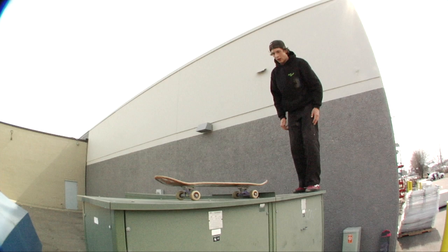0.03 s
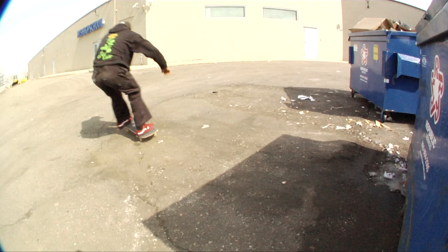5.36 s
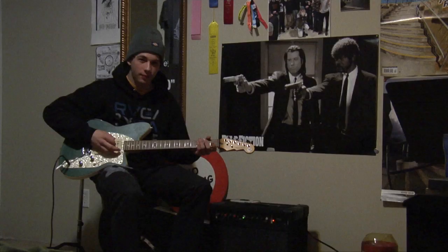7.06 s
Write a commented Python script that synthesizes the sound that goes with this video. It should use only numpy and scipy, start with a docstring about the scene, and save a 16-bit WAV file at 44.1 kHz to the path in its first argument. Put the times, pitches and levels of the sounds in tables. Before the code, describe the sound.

A skateboarder shuffles on a hollow metal cabinet, lands on it with two ringing booms, then smacks down on asphalt and rolls away over grit.

```python
"""First heard: far traffic humming and a skater shuffling on a hollow steel cabinet. Two jumps on the board boom
the sheet steel; a smack on asphalt overloads the microphone, yard walls answer, hard wheels roll away over grit.
Steel is noise dying band by band plus a few sine modes; scuffs, deck, walls and traffic are shaped noise;
rolling is rumble, grit and hiss plus single stone knocks. The rasp is three gliding fuzzy tones.
"""
import sys
import numpy as np
from scipy import signal
from scipy.fft import rfft, irfft, next_fast_len
from scipy.io import wavfile
from scipy.ndimage import uniform_filter1d, map_coordinates

SR = 44100
rng = np.random.default_rng(int(sys.argv[2]) if len(sys.argv) > 2 else 0)


def convert_level_to_amplitude(level_db):
    """Map a level in decibels to its linear amplitude factor."""
    exponent = np.asarray(level_db, float) / 20
    return 10 ** exponent


def inscribe(sig):
    """Save sig as 16-bit PCM at rate SR to the path in sys.argv[1].

    A 1-D sig is mono; a 2-D sig holds one channel per row.
    Samples are clipped to [-1, 1] before scaling.
    """
    pcm = np.round(np.clip(np.atleast_2d(sig).T, -1, 1) * 32767)
    wavfile.write(sys.argv[1], SR, pcm.astype(np.int16))


N = 317981

# Heavy blows on the cabinet. Each row: start in seconds, level in dB, ring length factor,
# brightness in dB per octave, rise in seconds.
BOOMS = [(2.7432, 6, 0.56, -0.5, 0.00069), (2.775, -7.5, 1, 2.5, .002), (3.0, -14, 0.84, 0.5, 0.019),
         (3.333, -4.5, 1, -0.5, 0.0011), (3.358, -5, 0.78, 4, 0.004), (3.41, -9.5, 0.62, 4.5, 0.011),
         (3.53, -21.5, 1, 2, .01), (3.635, -25.5, 0.99, -4, 0.02)]
# Dense modes of the sheet steel. Each row: frequency in Hz, relative density at the blow in dB per Hz.
STEEL_SPECTRUM = [(25, -30), (110, 3.5), (190, 6.5), (300, 9), (394, -3.5), (490, 8.5), (620, 2),
                  (750, -2.5), (1370, -6.5), (3500, -16.5), (5900, -26), (15000, -45)]
# Steel decay at length factor 1. Each row: frequency in Hz, t60 in seconds.
STEEL_T60 = [(40, 1.39), (200, 1.58), (500, 1.51), (1400, 1.02), (3000, 0.67), (8000, 0.24), (15000, 0.049)]
# Strongest single lid modes, nominal. Each row: frequency in Hz, relative level in dB, t60 in seconds at factor 1.
LID_MODES = [(174.3, 3.5, 0.66), (208, -5, 0.38), (317.5, -2, 1.6), (490, -6.5, 1.7), (608, -8.5, 0.26)]
# Loose panel, one row: centre in Hz, width in Hz, time in seconds when it starts to settle.
BUZZ = (8151, 400, 3.77)
# Blows that set the panel off. Each row: time in seconds, level in dB, t60 in seconds.
BUZZ_STARTS = [(2.76, -20.5, 1.02), (3.335, -20, 0.75)]
# Weaker panel modes. Each row: frequency in Hz, relative level in dB.
BUZZ_SIDES = [(6850, -11), (10300, -16)]
# Loose fittings on the steel. Each row: frequency in Hz, relative density in dB per Hz.
CLATTER_SPECTRUM = [(800, -18), (2000, 5.5), (3300, 2), (4600, -3.5), (6000, -8.5), (10500, -20.5),
                    (13000, -29)]
# Fittings shaken once more, one row: time in seconds, level in dB, rise, hold and t60 in seconds.
RATTLE = (3.645, -25, .025, .04, .35)
# Light contacts of shoe, tail and wheels on the cabinet. Each row: start in seconds, relative level in dB,
# ring length factor (floored in use), brightness in dB per octave.
TAPS = [(0.4001, -26.5, 0.065, -4.5), (2.0086, -18, 0.15, 0), (2.035, -26, 0.14, -1.5),
        (2.051, -39, 0.055, 5), (2.1565, -25, 0.73, 1.5), (2.365, -33, 0.11, 7.5), (2.399, -37, 0.11, 5),
        (2.4182, -14, 0.11, 3.5), (3.951, -35, 0.015, 6.5), (3.991, -38, 0.029, 8), (4.0602, -17, 0.6, 3.5),
        (4.361, -28, 0.11, -11), (4.4058, -13, 0.11, 3.5), (4.415, -19, 0.081, 4), (4.449, -25.5, 0.3, 2),
        (4.137, -33, 0.0706, 3)]
# Hard contact. Each row: frequency in Hz, relative density in dB per Hz.
CRACK_SPECTRUM = [(600, 7), (1500, 15), (3200, 15), (5300, -10.5), (7500, -21), (10000, -30), (13000, -39),
                  (16000, -57)]

# Landing, wheels then feet. Each row: start in seconds, level in dB before overload, hold and t60 in seconds.
LANDING = [(4.7085, 10.5, 0.0048, 0.073), (4.733, -11, 0.01, 0.028)]
# Wooden deck on asphalt. Each row: frequency in Hz, relative density in dB per Hz, before the tilts.
DECK_SPECTRUM = [(15, -75), (25, -26.5), (153, -1.5), (340, -5.5), (506, -3.5), (660, -5), (950, -11),
                 (1320, -15), (1660, -17.5), (2600, -27.5), (3600, -28.5), (4610, -43), (7710, -41),
                 (16000, -69)]
WALLS_S, WALLS_DB, WALLS_RISE_S, WALLS_HOLD_S, WALLS_T60_S = 4.8, -17.5, 0.062, 0.049, 0.39
WALLS_END_S = 4.95  # the last wall has answered

# Surface under the wheels. Each row: time in seconds, roughness in dB.
ROLL = [(5.0, -53), (5.035, -51), (5.045, -43), (5.09, -45), (5.15, -49), (5.33, -39.5), (5.44, -43),
        (5.465, -38), (5.49, -42), (5.52, -36), (5.58, -34.5), (5.64, -41.5), (5.72, -41.5), (6.0, -42),
        (6.13, -49.5), (6.28, -39.5), (6.32, -51), (6.49, -51), (6.54, -37.5), (6.6, -53.5), (6.93, -55.5),
        (7.02, -46), (7.121, -49)]
# Weight pressing the deck. Each row: time in seconds, rumble level in dB at mean roughness.
WEIGHT = [(5.0, -38), (5.3, -36.5), (5.6, -44), (6.2, -40.5), (6.6, -41), (6.9, -38), (7.12, -40.5)]
# Rumble through the deck. Each row: frequency in Hz, relative density in dB per Hz.
RUMBLE_SPECTRUM = [(15, -59), (25, -27.5), (97, 1.5), (269, -2), (300, 3.5), (378, -5), (469, 0.5),
                   (1000, -14.5), (1300, -48), (2200, -120)]
# Small grit. Each row: frequency in Hz, relative density in dB per Hz.
GRIT_SPECTRUM = [(470, -33), (800, 5), (1070, 3), (1310, 5), (2000, -1), (2550, -6), (3150, -7.5),
                 (3620, -10), (4000, -20.5), (5200, -43), (8800, -120)]
# Bearings and fine dust. Each row: frequency in Hz, relative density in dB per Hz.
HISS_SPECTRUM = [(1760, -38), (3000, -4), (4570, -6.5), (6860, -6), (8000, -8.5), (8820, -17), (12600, -17),
                 (13700, -24), (16000, -27.5)]
# Larger stones. Each row: start in seconds, relative level in dB, knock pitch in Hz, relative treble in dB.
STONES = [(5.044, -30, 1400, -3), (5.0742, -28.5, 1240, -7.5), (5.0928, -31, 1190, -0.5),
          (5.242, -23.5, 1110, -4.5), (5.264, -23.5, 1200, -36), (5.285, -24, 950, -23),
          (5.309, -34, 805, -5), (5.326, -21.5, 997, -13), (5.368, -21, 1260, -13),
          (5.503, -23, 1414, -26.5), (5.515, -29, 1310, 4.5), (5.5301, -19, 2090, -24),
          (5.5553, -23, 1600, -4), (5.6027, -22, 1926, -13), (5.623, -21, 1880, -10),
          (5.651, -20, 1990, -27), (5.6656, -25, 1580, -22), (5.6904, -17.5, 1420, -15),
          (5.7152, -25, 1415, -13), (5.762, -23, 1994, -25.5), (5.814, -25, 1353, -7),
          (5.8629, -19, 2083, -13), (5.914, -24.5, 1904, -24.5), (5.9619, -23.5, 1430, -2.5),
          (5.994, -27, 1870, -21), (6.0254, -29, 1400, -16), (6.087, -33, 1420, 0.5),
          (6.203, -28, 1250, -20), (6.493, -41, 1290, 10.5), (6.509, -29, 1830, 2.5),
          (6.5302, -31, 1318, -2), (6.5787, -24, 1280, -7), (6.6513, -33, 1350, -4),
          (6.7366, -24.5, 1440, -24.5), (6.856, -34.5, 1470, -2), (6.976, -38, 1430, -20),
          (7.0188, -28, 1530, -18.5)]
RUMBLE_FOLLOWS, HISS_FOLLOWS = 0.61, 0.59  # dB per dB of roughness
HISS_DB = -57  # at mean roughness
GRAIN = .75  # share of the bumps in grit and hiss
SCRATCH_T60_S, KNOCK_T60_CYCLES = 0.021, 28.4
PEBBLES, PEBBLE_OVER_GRIT_DB, PEBBLE_SCATTER_DB = 700, -0.5, 1
PEBBLE_HZ, PEBBLE_LOG_SPREAD, PEBBLE_TREBLE_DB = 1750, 0.438, -11

# Soles on grip tape. Each row: time in seconds, level in dB, rise and t60 in seconds.
SCUFFS = [(1.91, -64, 0.092, .1), (2.016, -50.5, 0.0083, 0.38), (2.372, -45, 0.27, 0.061),
          (2.42, -50.5, 0.0079, 0.98), (3.94, -54.5, 0.076, 1), (4.057, -41, 0.0046, 0.14),
          (4.406, -38, 0.0046, 0.14)]
# Friction. Each row: frequency in Hz, relative density in dB per Hz.
SCUFF_SPECTRUM = [(710, -29), (1200, -2.5), (1280, -1.5), (1720, -13.5), (3320, -12.5), (5650, -26.5),
                  (6440, -17), (9010, -28), (10100, -19), (11300, -40.5), (16000, -45)]
# Board drumming on the lid. Each row: start and hold in seconds, level in dB, t60 in seconds after the hold.
DRUMMING = [(2.026, 0.48, -42, 0.96), (3.857, 0.067, -56, 0.86), (4.085, 0.27, -31.5, 3.4)]
# Drumming lid. Each row: frequency in Hz, relative density in dB per Hz.
DRUM_SPECTRUM = [(15, -43), (25, 0.5), (300, 2), (401, -7), (636, -6.5), (1010, -16.5), (1840, -29.5),
                 (2500, -30), (3250, -35.5), (5500, -120)]
# Weight shifts that flex the lid. Each row: time in seconds, level in dB.
FLEXES = [(2.02, -30.5), (2.43, -41.5), (2.75, -40.5), (3.93, -34.5), (4.45, -48), (4.69, -43)]
# Flexing lid. Each row: frequency in Hz, relative density in dB per Hz.
THUD_SPECTRUM = [(15, -28.5), (35, 3.5), (70, -2), (130, -14.5), (300, -59)]
LINGER_DB, LINGER_T60_S = -11, 1.14  # the sole keeps shifting faintly after each scuff
FLEX_RISE_S, FLEX_T60_S, DRUM_RISE_S = 0.037, 1.2, 0.043
TAKE_OFF_S = 4.7  # the board leaves the lid

RASP_S, RASP_DB, RASP_RISE_S, RASP_HOLD_S, RASP_T60_S = 2.31, -49, .04, 0.055, 0.04
RASP_HZ, RASP_HZ_PER_S = 3020, 7000

# Thin whistling bands, probably the bearings. Each row: centre and width in Hz, level in dB, hold in seconds.
WHISTLE = [(3620, 460, -63.5, 0.2), (6040, 400, -71, 0.6), (8300, 600, -66, .12)]
WHISTLE_S, WHISTLE_RISE_S, WHISTLE_T60_S = 6.36, 0.0507, .5
# Ticks of flung grit. Each row: time in seconds, level in dB.
TICKS = [(6.6532, -41), (6.698, -51), (6.752, -44), (6.826, -53), (6.931, -48), (7.058, -48)]
# One tick. Each row: frequency in Hz, relative density in dB per Hz.
TICK_SPECTRUM = [(4500, -40), (6500, 6), (8000, 0), (11000, -4), (14000, -26)]
TICK_T60_S = 0.016

# Far traffic. Each row: frequency in Hz, relative density in dB per Hz.
TRAFFIC_SPECTRUM = [(15, -35), (25, -21.5), (53, -4.5), (165, -9.5), (201, -14.5), (235, -9.5),
                    (268, -13.5), (357, -15), (382, -21.5), (477, -17.5), (887, -18), (1610, -24),
                    (4010, -49.5), (5000, -64.5), (6500, -76), (11000, -120)]
END_S = 7.129  # the sound drops away


def unit(x):
    """Scale to rms 1."""
    return x / np.sqrt(np.mean(x ** 2) + 1e-20)


def along(points, hz):
    """Interpolate (Hz, value) points on a log frequency axis."""
    f, v = np.transpose(points)
    return np.interp(np.log(hz + 1), np.log(f + 1), v)


def curves(rows):
    """One dB curve per column; the last row is held 12 ms, then silence."""
    s, *cols = np.transpose([*rows, (rows[-1][0] + .012, *rows[-1][1:])])
    return [np.interp(np.arange(N) / SR, s, c, -120, -120) for c in cols]


def wobble(rate_hz):
    """Smooth random curve of rms 1 with rate_hz knots a second."""
    knots = rng.standard_normal(int(N * rate_hz / SR) + 4)
    return unit(map_coordinates(knots, [np.arange(N) * rate_hz / SR]))


def coloured(x, spectrum):
    """Filter x through a (Hz, dB) spectrum and scale to rms 1."""
    m = next_fast_len(N + 8192)
    gain = convert_level_to_amplitude(along(spectrum, np.fft.rfftfreq(m, 1 / SR)))
    return unit(irfft(rfft(x, m) * gain, m)[:N])


def noise(spectrum, lumpy_db, rate_hz):
    """Coloured noise whose level flutters."""
    return coloured(rng.standard_normal(N) * convert_level_to_amplitude(lumpy_db * wobble(rate_hz)), spectrum)


def add(out, s, x):
    """Mix x into out from time s."""
    part = out[round(s * SR):][:len(x)]
    part += x[:len(part)]


def swell(s, rise_s, hold_s, t60_s):
    """Gain that reaches 1 at time s, holds, then dies away."""
    t = np.arange(N) / SR - s
    attack = np.clip(1 + t / max(rise_s, 1e-3), 0, 1) ** 2
    return attack * np.exp(-np.log(1000) * np.maximum(t - hold_s, 0) / max(t60_s, .01))


def steel_ring(length, bright_db, rise_s, modes_db):
    """Countless modes blur to noise, each band dying at its own speed; a few strong ones stand out."""
    lead = 1024  # samples trimmed off the front
    burst = rng.standard_normal(lead + int(SR * min(2 * length, 2)))
    hz, t, z = signal.stft(burst, SR, nperseg=512)
    shape = convert_level_to_amplitude(along(STEEL_SPECTRUM, hz) + bright_db * np.log2((hz + 1) / 500))
    t60_s = length * along(STEEL_T60, hz)
    fade = convert_level_to_amplitude(-60 * np.maximum(t - lead / SR, 0) / t60_s[:, None])
    ring = signal.istft(z * fade * shape[:, None], SR, nperseg=512)[1][lead:]
    ring = ring / np.sqrt(np.mean(shape ** 2))
    t = np.arange(len(ring)) / SR
    for mode_hz, db, mode_t60_s in LID_MODES:
        gain = convert_level_to_amplitude(modes_db + db + rng.normal(0, 3) - 60 * t / (length * mode_t60_s))
        ring = ring + gain * np.sin(2 * np.pi * (mode_hz * rng.normal(1, .03) * t + rng.random()))
    return ring * np.minimum(t / rise_s, 1)


def booms():
    """Heavy blows set the whole sheet ringing."""
    out = np.zeros(N)
    for s, db, length, bright_db, rise_s in BOOMS:
        add(out, s, convert_level_to_amplitude(db) * steel_ring(length, bright_db, max(rise_s, 1e-4), modes_db=-11.5))
    return out


def panel_buzz(energy):
    """A loose panel buzzes steadily while the steel swings hard, then in bursts."""
    centre_hz, width_hz, settles_s = BUZZ
    loose = sum(convert_level_to_amplitude(db) * swell(s, .01, 0, t60_s) for s, db, t60_s in BUZZ_STARTS)
    loose = loose * swell(0, 0, settles_s, .3)
    band = [(4000, -50)]
    for hz, db in sorted(BUZZ_SIDES + [(centre_hz, 0)]):
        for widths, drop_db in ((-1.4, 12), (-.5, 2), (.5, 2), (1.4, 14)):
            band.append((hz + widths * width_hz, db - drop_db))
    band.append((14000, -45))
    energy_db = 10 * np.log10(energy + 1e-9)
    chatter = .62 + .38 * np.tanh(2 * (wobble(70) + (energy_db + 25) / 8))
    return loose * chatter * noise(band, lumpy_db=3, rate_hz=150)


def fittings(energy):
    """Loose fittings clatter as the steel swings, and shake once more on their own."""
    s, db, *shape = RATTLE
    gain = convert_level_to_amplitude(-19) * energy ** 0.63 + convert_level_to_amplitude(db) * swell(s, *shape)
    return gain * noise(CLATTER_SPECTRUM, lumpy_db=1.0, rate_hz=280)


def light_taps():
    """Light contacts: a short ring, a crack and the single sharp push of first touch."""
    out = np.zeros(N)
    crack, t = coloured(rng.standard_normal(N), CRACK_SPECTRUM), np.arange(999) / SR
    push = (1 - t / .0002) * np.exp(-t / .0002)
    for s, db, length, bright_db in TAPS:
        add(out, s, convert_level_to_amplitude(db - 12.0) * steel_ring(max(length, .02), bright_db, 0.00049, modes_db=-13.5))
        crack_gain = convert_level_to_amplitude(db - 10.5 + 1.85 * bright_db - 60 * t / 0.012)
        add(out, s, crack_gain * crack[round(s * SR):][:999])
        add(out, s, -convert_level_to_amplitude(db - 8 + np.clip(.6 * bright_db, -8, 0)) * push)
    # rubber and wood blunt the top
    return signal.sosfilt(signal.butter(4, 10500, fs=SR, output="sos"), out)


def cabinet():
    """The booms, the loose panel buzzing after the blows, the clattering fittings, and the light taps."""
    boom = booms()
    energy = np.abs(uniform_filter1d(boom ** 2, size=400, origin=199))  # mean over about 9 ms
    return boom + panel_buzz(energy) + fittings(energy) + light_taps()


def landing():
    """The deck slaps the ground in noise bursts, treble kept."""
    smack, t = np.zeros(N), np.arange(SR // 4) / SR
    for s, db, hold_s, t60_s in LANDING:
        add(smack, s, convert_level_to_amplitude(db - 60 * np.maximum(t - hold_s, 0) / t60_s) * np.minimum(t / 0.0024, 1))
    bright = [(hz, db + 2.8 * np.log2(hz / 500)) for hz, db in DECK_SPECTRUM]
    return smack * noise(bright, lumpy_db=1, rate_hz=200)


def yard_walls():
    """The walls return the smack smeared: it swells, holds and dies, with less bass than the deck table."""
    far = [(hz, db + 1.0 * np.log2(hz / 500)) for hz, db in DECK_SPECTRUM]
    gain = convert_level_to_amplitude(WALLS_DB) * swell(WALLS_S, WALLS_RISE_S, WALLS_HOLD_S, WALLS_T60_S)
    return gain * swell(0, 0, WALLS_END_S, 0.4) * noise(far, lumpy_db=2.2, rate_hz=160)


def random_pebbles(grit_db):
    """Smaller stones at random times, their level following the roughness."""
    times = rng.uniform(ROLL[2][0], ROLL[-1][0], PEBBLES)
    rows = []
    for s, (a, b, c) in zip(times, rng.standard_normal((PEBBLES, 3))):
        db = grit_db[round(s * SR)] + PEBBLE_OVER_GRIT_DB + PEBBLE_SCATTER_DB * a
        hz = PEBBLE_HZ * np.exp(PEBBLE_LOG_SPREAD * np.clip(b, -2, 1.5))
        rows.append((s, db, hz, PEBBLE_TREBLE_DB + 3 * c))
    return rows


def stone_knocks(grit_db):
    """Each stone knocks a wheel: two dying sines and a short scratch."""
    out, t = np.zeros(N), np.arange(SR // 12) / SR
    grit = coloured(rng.standard_normal(N), GRIT_SPECTRUM)
    hiss = coloured(rng.standard_normal(N), HISS_SPECTRUM)
    for s, db, hz, treble_db in STONES + random_pebbles(grit_db):
        now = slice(round(s * SR), round(s * SR) + len(t))
        tones = np.sin(2 * np.pi * hz * t) + 0.25 * np.sin(2 * np.pi * 1.68 * hz * t)
        knock = 0.62 * convert_level_to_amplitude(-60 * t * hz / KNOCK_T60_CYCLES) * tones
        scratch = 0.26 * convert_level_to_amplitude(-60 * t / SCRATCH_T60_S) * (grit[now] + convert_level_to_amplitude(treble_db) * hiss[now])
        add(out, s, convert_level_to_amplitude(db) * (knock + scratch) * np.minimum(t / .0005, 1))
    return out


def rolling():
    """Rumble through the deck, a hail of small grit, hiss, and stones that knock a wheel."""
    grit_db, = curves(ROLL)
    swing_db = grit_db - np.mean(ROLL, axis=0)[1]
    bumps_db = 4.8 * wobble(350) + 0.62 * np.tanh(wobble(70))  # shared by rumble, grit and hiss
    rumble_gain = convert_level_to_amplitude(curves(WEIGHT)[0] + RUMBLE_FOLLOWS * swing_db + .5 * bumps_db)
    rumble = rumble_gain * noise(RUMBLE_SPECTRUM, lumpy_db=2.5, rate_hz=40)
    grain = convert_level_to_amplitude(GRAIN * bumps_db)
    grit = convert_level_to_amplitude(grit_db - 2.5) * coloured(rng.standard_normal(N) * grain, GRIT_SPECTRUM)
    hiss_gain = convert_level_to_amplitude(HISS_DB + HISS_FOLLOWS * swing_db)
    hiss = hiss_gain * coloured(rng.standard_normal(N) * grain, HISS_SPECTRUM)
    return (rumble + grit + hiss + stone_knocks(grit_db)) * swell(ROLL[0][0], .02, N, 1)


def shuffle():
    """Gritty friction above, the lid drumming and flexing below, until the board leaves."""
    scuff = np.zeros(N)
    for s, db, rise_s, t60_s in SCUFFS:
        linger = convert_level_to_amplitude(LINGER_DB) * swell(s, rise_s, 0, LINGER_T60_S)
        scuff += convert_level_to_amplitude(db) * (swell(s, rise_s, 0, t60_s) + linger)
    drum = sum(convert_level_to_amplitude(db) * swell(s, DRUM_RISE_S, hold_s, t60_s) for s, hold_s, db, t60_s in DRUMMING)
    flex = sum(convert_level_to_amplitude(db) * swell(s, FLEX_RISE_S, 0, FLEX_T60_S) for s, db in FLEXES)
    out = scuff * noise(SCUFF_SPECTRUM, lumpy_db=1.0, rate_hz=190)
    out += drum * noise(DRUM_SPECTRUM, lumpy_db=2.0, rate_hz=30)
    out += flex * noise(THUD_SPECTRUM, lumpy_db=0, rate_hz=9)
    return out * swell(0, 0, TAKE_OFF_S, .05)


def rasp():
    """A dragging sole slips fast and unevenly: three fuzzy bands glide up as it speeds up."""
    hz = RASP_HZ + RASP_HZ_PER_S * np.clip(np.arange(N) / SR - RASP_S, -RASP_RISE_S, RASP_HOLD_S)
    turn = 2 * np.pi * np.cumsum(hz * (1 + 0.07 * wobble(1500))) / SR
    upper_hz = 1.5 * hz ** 2 / RASP_HZ  # climbs faster
    upper = 2 * np.pi * np.cumsum(upper_hz * (1 + .08 * wobble(1500))) / SR
    gain = convert_level_to_amplitude(RASP_DB + 3.3 * wobble(200)) * swell(RASP_S, RASP_RISE_S, RASP_HOLD_S, RASP_T60_S)
    return gain * (np.sin(turn) + 0.49 * np.sin(upper) + 0.32 * np.sin(3.0 * turn))


def whistle():
    """Narrow bands of noise that flicker, on smoother ground."""
    out = np.zeros(N)
    for hz, width_hz, db, hold_s in WHISTLE:
        band = [(hz - 2 * width_hz, -40), (hz, 0), (hz + 2 * width_hz, -40)]
        gain = convert_level_to_amplitude(db) * swell(WHISTLE_S, WHISTLE_RISE_S, hold_s, WHISTLE_T60_S)
        out += gain * noise(band, lumpy_db=5.0, rate_hz=50)
    return out


def grit_ticks():
    """Flung grit: tiny bright bursts of noise."""
    gain = sum(convert_level_to_amplitude(db) * swell(s, 0, 0, TICK_T60_S) for s, db in TICKS)
    return gain * noise(TICK_SPECTRUM, lumpy_db=3.5, rate_hz=200)


def far_traffic():
    """Low noise hum whose level drifts slightly."""
    return convert_level_to_amplitude(-44.5) * noise(TRAFFIC_SPECTRUM, lumpy_db=.4, rate_hz=4)


def scene():
    """All sources over the traffic, one channel."""
    skater = cabinet() + shuffle() + rasp() + landing() + yard_walls()
    wheels = rolling() + whistle() + grit_ticks()
    return (skater + wheels + far_traffic())[None]


def roll_off(x):
    """The treble ends steeply here."""
    return signal.sosfilt(signal.butter(12, 16700, fs=SR, output="sos"), x)


def record(dry):
    """The microphone input clips flat, hisses and is band-limited; near the end only a dull hum stays."""
    top, hardness = .5, 8
    x = dry / (1 + np.abs(dry / top) ** hardness) ** (1 / hardness)
    dull = signal.sosfilt(signal.butter(2, 400, fs=SR, output="sos"), x)
    x = np.where(np.arange(N) / SR < END_S, x, convert_level_to_amplitude(-13.5) * dull)
    x = x + convert_level_to_amplitude(-74.5) * rng.standard_normal(N)
    m = next_fast_len(N)
    passband = np.fft.rfftfreq(m, 1 / SR) < 15900
    mix = irfft(rfft(x, m) * passband, m)[:, :N]
    return roll_off(mix)


dry = scene()
out = record(dry)
inscribe(out)
```